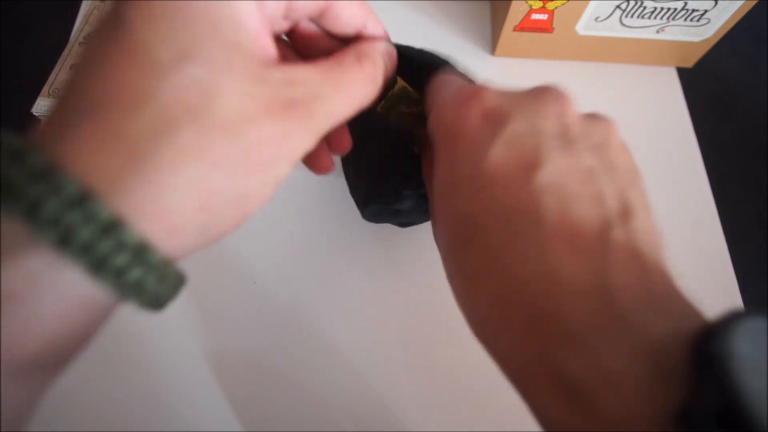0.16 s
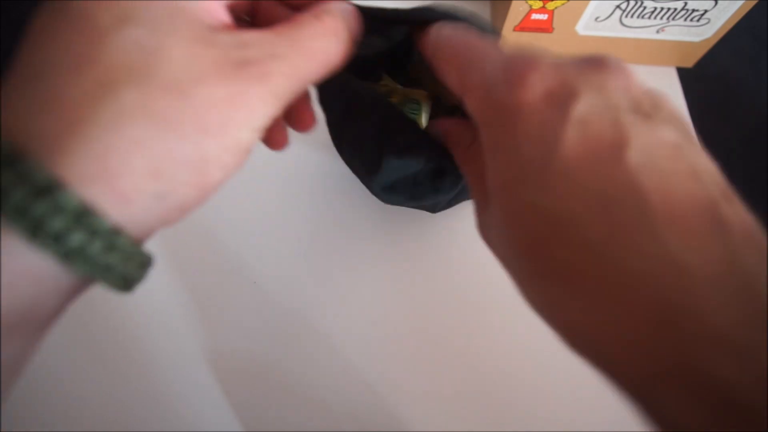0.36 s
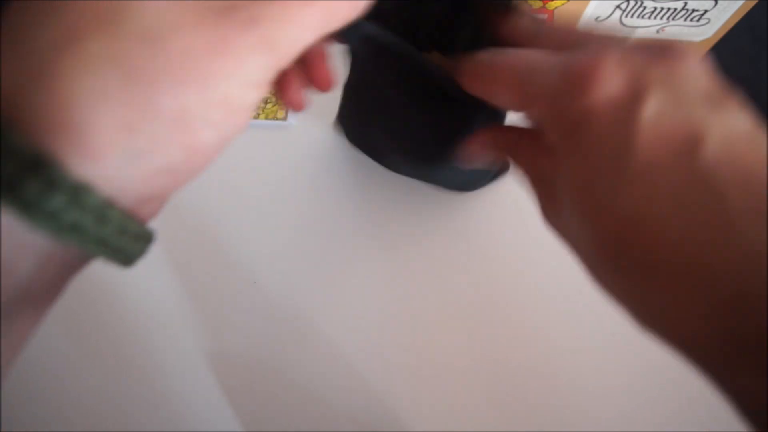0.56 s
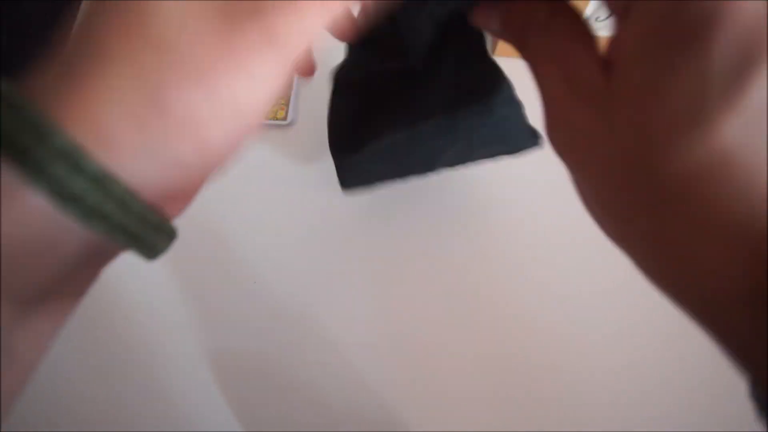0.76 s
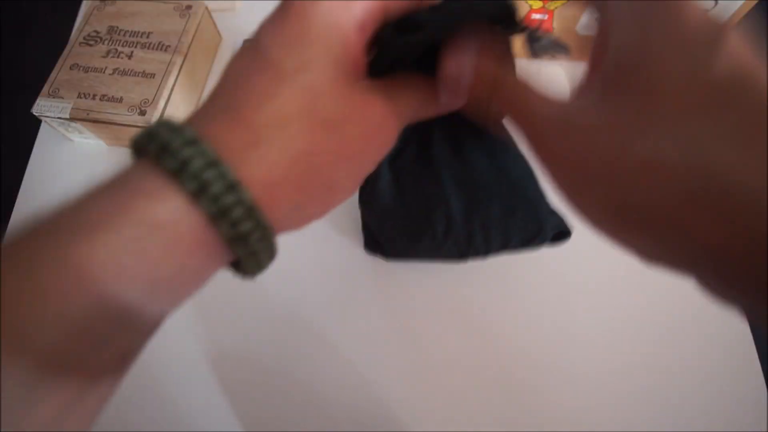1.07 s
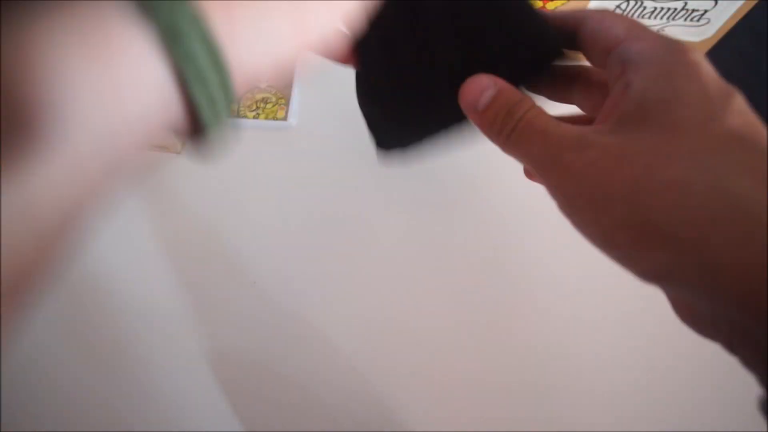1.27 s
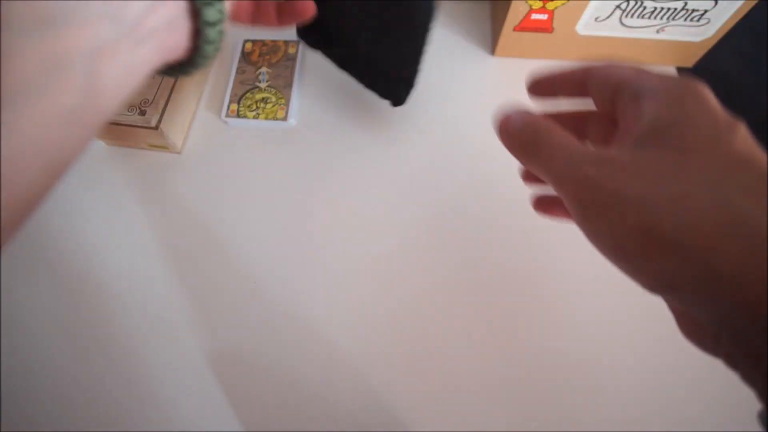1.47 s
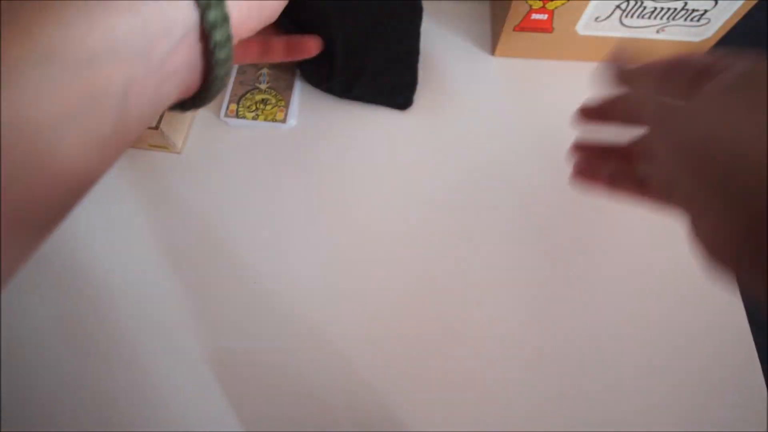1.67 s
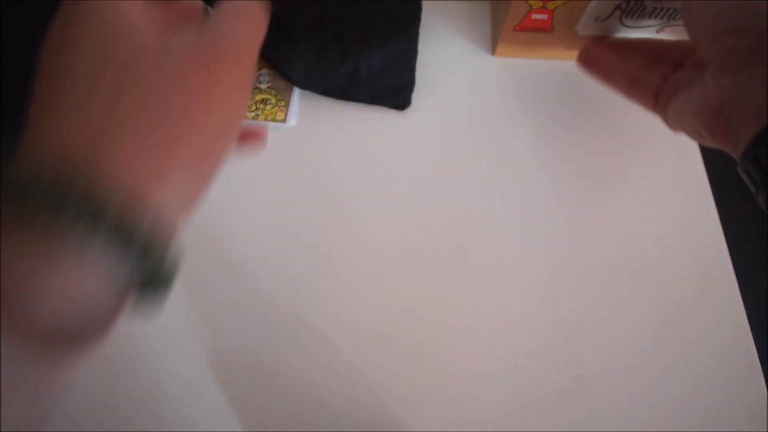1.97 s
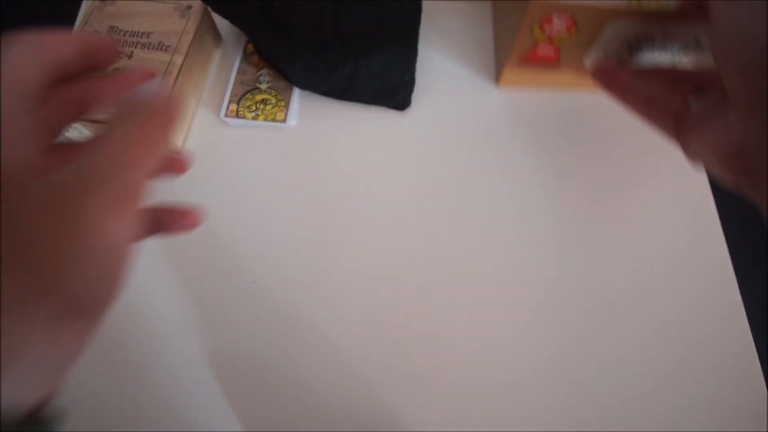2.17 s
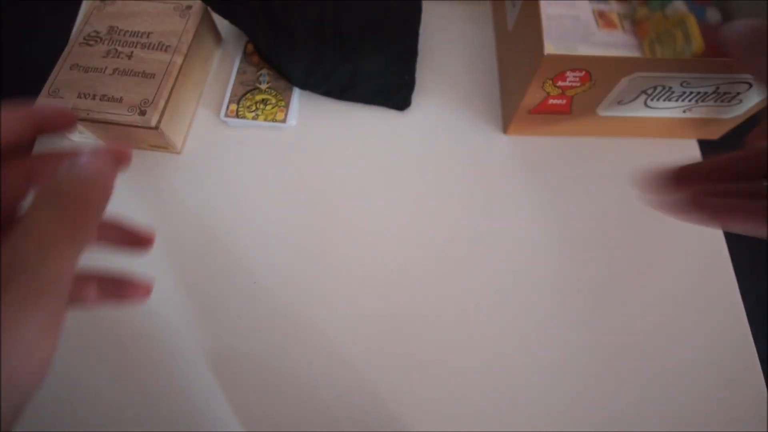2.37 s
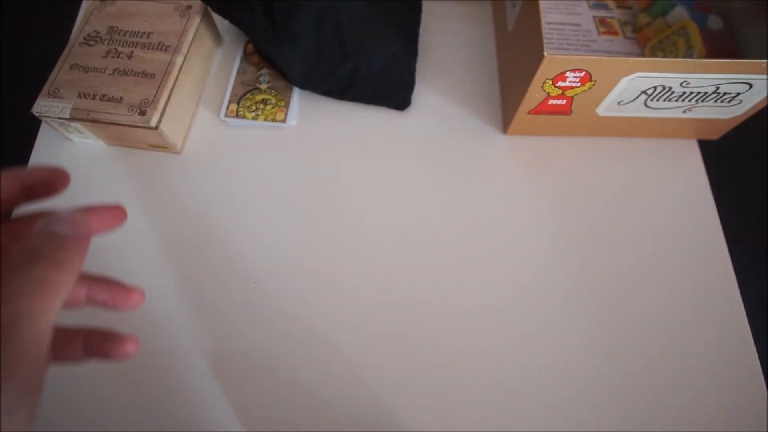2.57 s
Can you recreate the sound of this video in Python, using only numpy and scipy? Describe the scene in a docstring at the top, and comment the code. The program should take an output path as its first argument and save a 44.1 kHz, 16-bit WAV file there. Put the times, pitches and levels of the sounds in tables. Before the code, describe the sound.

Cardboard tiles click and rustle in a handled cloth bag, which bumps a table and is set down. Then a cardboard box scrapes across the tabletop and knocks to a stop, heard close in a small room.

```python
"""Tile bag and game box on a table

Close stereo perspective in a small, fairly live room. Cardboard tiles click inside a cloth bag that is
shaken, drawn shut, bumped on the table and set down. Then fingers take hold of a cardboard game box
and slide it over the table top until it knocks to a stop. Rubbing is noise from countless tiny slips;
each knock is a dying spray of micro-impacts, coloured by the body it strikes."""
import sys
import numpy as np
from scipy import signal
from scipy.fft import rfft, irfft
from scipy.io import wavfile
from scipy.ndimage import uniform_filter1d, map_coordinates

SR = 44100
rng = np.random.default_rng(int(sys.argv[2]) if len(sys.argv) > 2 else 0)


def bounce(signal):
    """Save signal as a 16-bit WAV file at the path given by the first command-line argument."""
    frames = np.transpose(np.atleast_2d(signal))
    limited = np.clip(frames, -1, 1)
    pcm = np.round(limited * 32767).astype(np.int16)
    wavfile.write(sys.argv[1], SR, pcm)


N = 119070
TIME = np.arange(N) / SR
HZ = np.maximum(np.fft.rfftfreq(N, 1 / SR), 1)
ATTACK_S, THUD_DECAY_S = .0003, .049
BOX_LAG_S, BAG_LAG_S = .00003, .000003  # the left microphone hears them later


def amp(db):
    """Decibels to gain."""
    return 10 ** (np.asarray(db) / 20)


def unit(x):
    """Scale to rms 1."""
    return x / np.sqrt(np.mean(x ** 2) + 1e-20)


def at_hz(points, hz=HZ):
    """Read a table on a log-frequency axis."""
    freqs, values = np.transpose(points)
    return np.interp(np.log(hz), np.log(freqs), values)


def level(curve):
    """Gain over time from a dB curve, silent outside it."""
    times, db = np.transpose(curve)
    return amp(np.interp(TIME, times, db, left=-120, right=-120))


def swells(rows):
    """Bell-shaped rises and falls of level."""
    return sum(amp(db) / (1 + ((TIME - peak_s) / width) ** 2 / 2) ** 2 for peak_s, db, width in rows)


def wander(samples):
    """Random drift of rms 1, smoothed over so many samples."""
    return unit(uniform_filter1d(rng.standard_normal(N), size=samples))


def coloured(x, db):
    """Causal (minimum-phase) filter with the given gain per frequency."""
    cepstrum = irfft(np.log(amp(db)), len(x))
    cepstrum[1:len(x) // 2] *= 2
    cepstrum[len(x) // 2 + 1:] = 0
    return irfft(rfft(x) * np.exp(rfft(cepstrum)), len(x))


def friction(colour, grain_db=2.5):
    """Countless tiny slips of uneven strength ring a body; rms 1."""
    strength = amp(grain_db * wander(24))
    return unit(coloured(rng.standard_normal(N) * strength, at_hz(colour)))


def contacts(rows, colour, crack_db=None, knee_hz=1700, size=8192):
    """Dying sprays of micro-impacts, coloured by the body and tilted above the knee."""
    out, t = np.zeros(N + size), np.arange(size) / SR
    hz = np.maximum(np.fft.rfftfreq(size, 1 / SR), 1)
    octaves_up = np.log2(np.maximum(hz / knee_hz, 1))
    bins = np.arange(len(hz))
    low, high = np.maximum(bins * 5 // 6 - 6, 0), np.minimum(bins * 6 // 5 + 6, bins[-1])
    for start_s, db, tilt_db, t60 in rows:
        spray = rng.standard_normal(size) * amp(-60 * t / t60) * (1 - np.exp(-t / ATTACK_S))
        if crack_db is not None:  # a hard contact starts with one crack
            spray[0] += amp(crack_db) * np.linalg.norm(spray)
        # even out the spray's broad spectrum; narrow peaks stay
        power = np.cumsum(abs(rfft(spray)) ** 2)
        broad_db = 10 * np.log10((power[high] - power[low]) / (high - low) + 1e-9)
        hit = coloured(spray, at_hz(colour, hz) - broad_db + tilt_db * octaves_up)
        i = int(start_s * SR)
        out[i:i + size] += amp(db) * hit / np.sqrt(np.sum(hit ** 2) / (SR / 100))  # level over 10 ms
    return out[:N]


def thuds(rows, colour):
    """A heavy blow with its bounces."""
    return contacts([(*row, THUD_DECAY_S) for row in rows], colour)


def ringing(modes, start_s):
    """Modes set ringing by a blow, the same in both microphones."""
    t, out = np.maximum(TIME - start_s, 0), 0
    for hz, db, t60 in modes:
        envelope = amp(db - 60 * t / t60) * (1 - np.exp(-t * hz / 2))
        out = out + envelope * np.sin(2 * np.pi * hz * t) * rng.choice([-1, 1])
    return out


def diffuse():
    """Spectra of noise at the two microphones, alike in the bass only."""
    # left-right likeness of the room: freq_hz, correlation
    likeness = [(300, 0.89), (1500, 0.1), (6000, 0)]
    alike = at_hz(likeness)
    mid, side = rfft(rng.standard_normal((2, N)))
    return (np.sqrt(1 + alike) * mid + np.sqrt(1 - alike) * side * np.array([[1], [-1]])) / np.sqrt(2)


def room_response():
    """Diffuse reflections that die faster in the treble."""
    # reverberation time: freq_hz, t60_s
    decays = [(250, 0.6), (700, 0.57), (2000, 0.4), (10000, 0.21)]
    noise, out = diffuse(), 0
    for hz, t60 in decays:
        band = at_hz([(f, f == hz) for f, _ in decays])
        tail = amp(-60 * TIME / t60) * (TIME > .004)  # arrives 4 ms after the direct sound
        out = out + irfft(noise * band, N) * tail / np.sqrt(np.sum(tail ** 2))
    return out


def scatter(level_db=-5, t60_s=.01, above_hz=1200):
    """The first milliseconds of treble reflections off table and hands, unrelated left and right."""
    t = TIME[:1024]
    burst = rng.standard_normal((2, len(t))) * amp(-60 * t / t60_s) * (1 - np.exp(-t / ATTACK_S))
    burst = signal.sosfilt(signal.butter(2, above_hz, "high", fs=SR, output="sos"), burst)
    return amp(level_db) * burst / np.sqrt(np.sum(burst ** 2, axis=1, keepdims=True))


def placed(x, room, pan_db, lag_s, room_db, moving=False, sway_s=.0006, sway_hz=1.5):
    """A source at the microphones: direct sound plus the room; positive pan is to the left."""
    left = irfft(rfft(x) * np.exp(-2j * np.pi * HZ * lag_s), N)
    close = np.array([left, x])
    if moving:  # its echo paths sway
        x = map_coordinates(x, [(TIME - sway_s * np.sin(2 * np.pi * sway_hz * TIME)) * SR])
    else:  # at rest it has steady near reflections
        close += signal.fftconvolve(x[None], scatter(), axes=1)[:, :N]
    reverb = amp(room_db) * signal.fftconvolve(x[None], room, axes=1)[:, :N]
    return (close + reverb) * amp([[pan_db / 2], [-pan_db / 2]]) / np.sqrt(1 + amp(room_db) ** 2)


def room_tone(level_db=-51.5):
    """A faint, steady hush from all round."""
    colour = [(30, -35), (120, 0), (16000, -1)]  # freq_hz, gain_db
    return amp(level_db) * unit(irfft(diffuse() * amp(at_hz(colour)), N))


def through_mouth(x, shut_s=.59):
    """The bag's mouth colours what is inside until it is drawn shut."""
    mouth = [(2600, 0.5), (3150, 3.5), (3700, 0.5), (4900, -2.5), (7000, 0)]  # freq_hz, gain_db
    return coloured(x * (TIME < shut_s), at_hz(mouth)) + x * (TIME >= shut_s)


def bag_rustle(room):
    """Cloth brushes and the tiles rub against each other as the bag moves."""
    # brushing cloth: time_s, level_db
    cloth = [(0, -27.5), (.17, -37), (.23, -43), (.48, -39.5), (.535, -34), (.56, -39), (.65, -43),
             (.70, -31.5), (.77, -37.5), (.83, -41.5), (.875, -29.5), (.955, -45), (1.0, -23.5),
             (1.04, -34.5), (1.10, -27.5), (1.125, -72), (1.18, -43), (1.2, -31), (1.23, -41.5),
             (1.27, -34), (1.305, -44), (1.345, -31), (1.39, -41), (1.42, -28.5), (1.455, -46),
             (1.505, -34), (1.54, -56), (1.59, -43), (1.62, -30), (1.7, -43), (2.04, -53.5)]
    # its bright hiss: freq_hz, gain_db
    cloth_colour = [(190, -23), (280, -13), (500, -13.5), (1300, -9), (2300, -9), (5000, -6), (12500, -1.5),
                    (16000, -0.5)]
    # shifting tiles: time_s, level_db
    shifting = [(0, -32.5), (.06, -54), (.15, -31.5), (.22, -61), (.33, -49), (.46, -44.5), (.57, -52.5),
                (.83, -60.5), (1.0, -37.5), (1.15, -59.5), (1.2, -46.5), (1.42, -45), (1.55, -56),
                (1.83, -49), (2.04, -61)]
    # their duller rub: freq_hz, gain_db
    shift_colour = [(190, -18.5), (275, 1.5), (1420, 2), (2750, -7), (3130, 6.5), (3500, -7),
                    (16000, -15.5)]
    rustle = level(cloth) * friction(cloth_colour) + level(shifting) * friction(shift_colour)
    return placed(through_mouth(rustle), room, pan_db=1.7, lag_s=BAG_LAG_S, room_db=-1.5, moving=True)


def drawstring(room):
    """The cord zips through the hem, a little to the left."""
    # pulls: time_s, peak_db, half_width_s
    zips = [(.974, -23.5, 0.003), (1.337, -18.5, 0.0075)]
    # thin hiss of cord on cloth: freq_hz, gain_db
    colour = [(1000, -42), (10800, -27), (11900, -12), (13200, -17.5), (16000, -21.5)]
    cord = swells(zips) * friction(colour)
    return placed(cord, room, pan_db=3, lag_s=BAG_LAG_S, room_db=-13, moving=True)


def tile_clicks(room):
    """Tile edges skitter over each other inside the bag."""
    # edge contacts: start_s, level_db, tilt_db_per_octave, t60_s
    clicks = [(.4538, -29, 0.5, 0.032), (.543, -31, 3.5, 0.011), (.899, -18.5, 0, 0.013),
              (.9925, -23.5, -3, .024), (1.0002, -26, 2, 0.0067), (1.4035, -24.5, 1, 0.025)]
    # resonances of the tiles: freq_hz, gain_db
    colour = [(190, -25.5), (280, 1), (430, -8.5), (620, 3.5), (1300, 4.5), (1750, -7), (3130, 4.5),
              (3800, 1), (8000, -1.5), (16000, -7)]
    return placed(through_mouth(contacts(clicks, colour)), room, pan_db=1, lag_s=BAG_LAG_S, room_db=-7)


def tile_clacks(room, t60_s=.011):
    """Tiles meet face to face in one clean impact and ring briefly, each at its own pitch."""
    # impacts: start_s, level_db, tilt_db_per_octave, pitch_hz
    clacks = [(0.0896, -33.5, -17, 1380), (0.1035, -30, -4, 1440), (.1175, -31, -4, 1260),
              (.1372, -22.5, -1, 1810), (.1628, -21.5, 2.5, 1440), (0.3195, -42, -6, 1270),
              (0.493, -35.5, 3, 1390), (0.5211, -26, 3.5, 1360)]
    # resonances of one tile: pitch_ratio, gain_db
    tile = [(.12, -36), (.19, -4), (.4, -9.5), (.68, -5), (1, 3.5), (1.35, -3), (1.8, -11), (11, -21)]
    hits = 0
    for start_s, db, tilt_db, pitch_hz in clacks:
        colour = [(ratio * pitch_hz, gain_db) for ratio, gain_db in tile]
        hits = hits + contacts([(start_s, db, tilt_db, t60_s)], colour, crack_db=11)
    return placed(hits, room, pan_db=0, lag_s=BAG_LAG_S, room_db=-6.5)


def bag_on_table(room):
    """The full bag bumps the table, then is set down; the top rings on each time."""
    # blows of the bump: start_s, level_db, tilt_db_per_octave
    bumps = [(0.8835, -14.5, -1), (.912, -22, -28), (1.062, -36, 3)]
    # their thud: freq_hz, gain_db
    bump_colour = [(190, -22), (270, 9), (430, -10), (640, -3.5), (930, 5), (1400, -10), (2200, -18),
                   (16000, -24.5)]
    # table modes after the bump: pitch_hz, level_db, t60_s
    bump_modes = [(265, -13, 0.17), (630, -20, 0.2), (918, -24.5, 0.47)]
    # blows of setting down: start_s, level_db, tilt_db_per_octave
    drops = [(1.5955, -11, 0.5), (1.602, -18, -1.1), (1.617, -16.5, -0.27)]
    # their thud: freq_hz, gain_db
    drop_colour = [(195, -26.5), (280, 5.5), (460, -11.5), (660, 1.5), (950, -13), (1400, -14), (2400, -17),
                   (3000, -19.5), (5000, -24), (16000, -28)]
    # table modes after setting down: pitch_hz, level_db, t60_s
    drop_modes = [(266.8, -10, 0.21), (297, -20, 0.38), (596, -22, 0.55), (647.8, -18.5, 0.51)]
    blows = thuds(bumps, bump_colour) + thuds(drops, drop_colour)
    rings = ringing(bump_modes, bumps[0][0]) + ringing(drop_modes, drops[0][0])
    return placed(blows, room, pan_db=.7, lag_s=BAG_LAG_S, room_db=-1.5) + rings


def finger_taps(room, t60_s=.023):
    """Fingers tap the cardboard as they take hold of the box."""
    # fingers landing: start_s, level_db, tilt_db_per_octave
    taps = [(1.9253, -35.5, -1), (1.947, -28, -0.5), (1.9594, -26.5, 3), (1.973, -30, 1.5),
            (1.995, -32.5, -0.5)]
    # resonances of the tapped box: freq_hz, gain_db
    colour = [(150, -5.5), (320, 10.5), (680, 12.5), (1640, -1), (1950, 7.5), (2550, -4), (6700, -12),
              (16000, -24)]
    ticks = contacts([(*tap, t60_s) for tap in taps], colour, crack_db=-1)
    return placed(ticks, room, pan_db=-1.5, lag_s=BOX_LAG_S, room_db=-3.5)


def wall_booms(waver_hz=25, waver_s=.008):
    """The box walls boom as it breaks loose, each boom swelling and fading at one wavering pitch."""
    # booms: time_s, peak_db, half_width_s, pitch_hz
    booms = [(2.113, -20, 0.0057, 265), (2.138, -24.5, 0.0053, 270), (2.165, -23, 0.023, 798)]
    out = 0
    for peak_s, db, width, pitch_hz in booms:
        hz = pitch_hz + waver_hz * wander(int(waver_s * SR))
        tone = np.sqrt(2) * np.sin(2 * np.pi * np.cumsum(hz) / SR)
        out = out + swells([(peak_s, db, width)]) * tone
    return out


def box_body(room):
    """The hollow box booms as it sets off, then knocks to a stop and rings."""
    # stopping blows: start_s, level_db, tilt_db_per_octave
    stops = [(2.379, -12, -1), (2.39, -16, -11), (2.402, -20, -3)]
    # their hollow knock: freq_hz, gain_db
    colour = [(140, -35), (225, -8), (315, -5), (400, -15.5), (490, -1.5), (590, -10.5), (730, -5),
              (820, -18), (930, 6), (1150, -16), (1400, -6), (1620, -23), (1880, -11), (3700, -25.5),
              (16000, -48)]
    # ring after the stop: pitch_hz, level_db, t60_s
    modes = [(408, -29.5, 0.35), (929, -11.5, 0.2), (933, -19.5, 0.46)]
    body = wall_booms() + thuds(stops, colour)
    return placed(body, room, pan_db=-.3, lag_s=BOX_LAG_S, room_db=-8.5) + ringing(modes, stops[0][0])


def box_slide(room):
    """The box scrapes over the table, off to the right; each microphone also hears its own edge."""
    # course of the slide: time_s, level_db
    slide = [(2.04, -51), (2.066, -32.5), (2.088, -23.5), (2.102, -16), (2.2, -13), (2.29, -15),
             (2.345, -15), (2.365, -19.5), (2.385, -34), (2.41, -65)]
    # cardboard on the table top: freq_hz, gain_db
    colour = [(110, -34.5), (280, -2.5), (420, -8), (590, -1), (790, 5), (950, -1), (1400, -4.5), (1900, 6),
              (2350, -1.5), (3050, 5), (3800, -1.5), (4800, 3), (7000, -1), (10000, 1), (16000, -2)]
    # stereo balance: freq_hz, left_minus_right_db
    balance = [(700, 0), (2400, -5), (15000, 0.5)]
    scrape, *edges = [level(slide) * friction(colour, grain_db=1.5) for _ in range(3)]
    stereo = placed(scrape, room, pan_db=0, lag_s=BOX_LAG_S, room_db=-7.5, moving=True)
    stereo += amp(-4.5) * np.array(edges)
    return irfft(rfft(stereo) * amp(at_hz(balance) * np.array([[.5], [-.5]])), N)


def scene():
    """Bag and box, close to the microphones in one quiet room."""
    room = room_response()
    hush = room_tone()
    bag = bag_rustle(room) + drawstring(room) + tile_clicks(room) + tile_clacks(room)
    return hush + bag + bag_on_table(room) + finger_taps(room) + box_body(room) + box_slide(room)


def record(dry, low_cut_hz=60, high_cut_hz=15800):
    """The recorder thins the bass, clips peaks under full scale and cuts the top."""
    thinned = signal.sosfilt(signal.butter(1, low_cut_hz, "high", fs=SR, output="sos"), dry)
    low_pass = signal.firwin(401, high_cut_hz, fs=SR, window=("kaiser", 8))
    return signal.fftconvolve(np.clip(thinned, -.8, .8), low_pass[None], "same", axes=1)


dry = scene()
out = record(dry)
bounce(out)
```